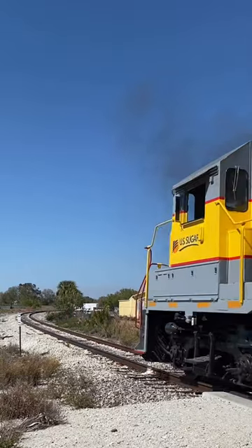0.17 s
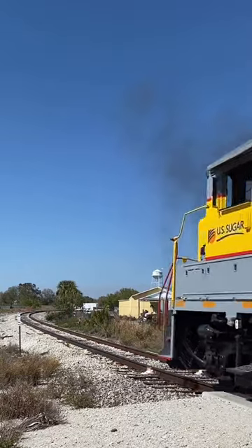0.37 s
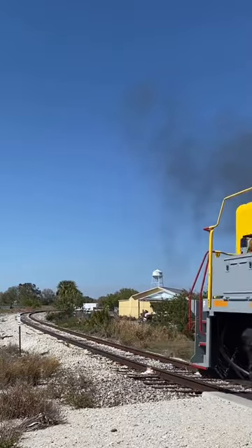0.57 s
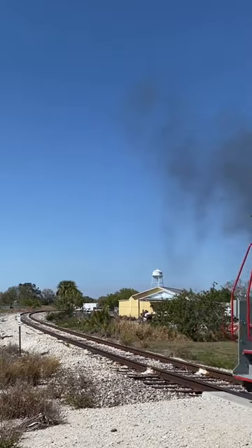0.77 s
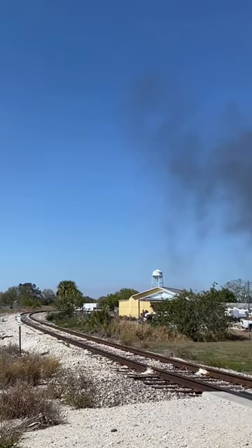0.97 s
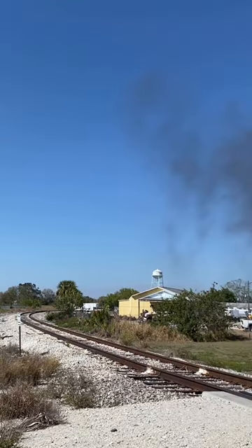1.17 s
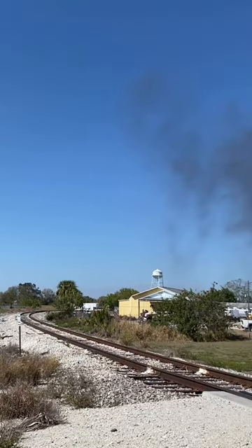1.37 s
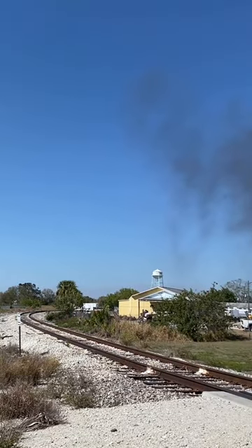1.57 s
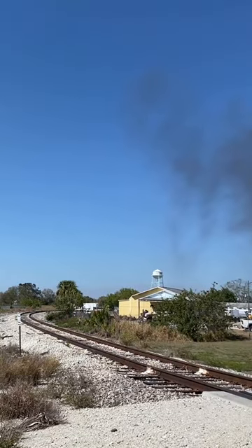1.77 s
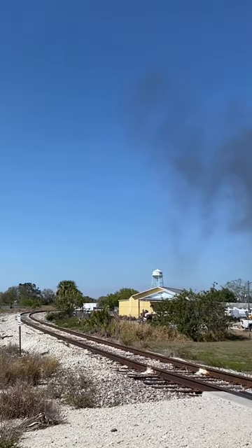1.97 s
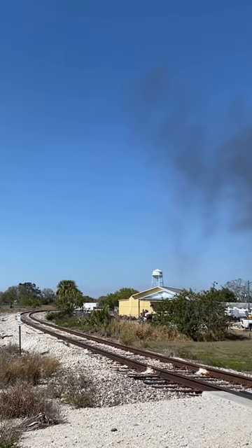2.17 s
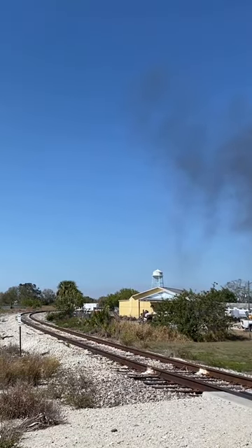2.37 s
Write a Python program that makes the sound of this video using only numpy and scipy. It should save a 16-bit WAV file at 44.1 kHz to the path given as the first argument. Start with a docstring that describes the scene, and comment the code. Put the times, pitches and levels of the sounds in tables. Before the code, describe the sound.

A diesel locomotive is already alongside at 0 s, with deep engine boom, surging wheel roar, crunching grit and short steel scrapes, strongest until about 0.6 s. A tiny falling squeak comes near 0.24 s. From 0.7 s thin, raspy flange squeals and hiss waver over the rumble. After 1.2 s the wheels fade, leaving a slow throb about five times a second, receding until 2.5 s. Open air, close stereo.

```python
"""A diesel locomotive rolls past close by on curved track in open country and draws away.
Its slow engine throbs once per crank turn, from summed crank-order tones; filtered noise gives its surging rumble.
The wheels roar, crunch and scrape as shaped noise, and one falling chirp is a squeak of steel.
Thin flange tones, wavering and raspy, swell and fade in the curve; a microphone pair hears it all."""
import sys
import numpy as np
from scipy import signal
from scipy.fft import rfft, irfft
from scipy.io import wavfile

SR = 44100
rng = np.random.default_rng(int(sys.argv[2]) if len(sys.argv) > 2 else 0)


def dump(signal):
    """Clip the signal to [-1, 1] and save it as 16-bit WAV at the path in sys.argv[1]."""
    limited = np.clip(np.atleast_2d(signal).T, -1, 1)
    pcm = np.round(limited * 32767).astype(np.int16)
    wavfile.write(sys.argv[1], SR, pcm)


N = 111573
T, HZ = np.arange(N) / SR, np.fft.rfftfreq(N, 1 / SR)


def amp(db):
    """Decibels to gain."""
    return 10 ** (np.asarray(db) / 20)


def unit(x):
    """Scales to rms 1."""
    return x / np.sqrt(np.mean(abs(x) ** 2) + 1e-20)


def by_hz(points):
    """Reads a table over log frequency."""
    f, value = np.transpose(points)
    return np.interp(np.log(HZ + 1), np.log(f + 1), value)


def level(rows, order=1):
    """Gain over time from one dB column of a table."""
    rows = np.array(rows)
    return amp(np.interp(T, rows[:, 0], rows[:, order]))


def wander(rate_hz, size=4096):
    """Slow random motion of rms 1."""
    step_s = N / SR / size
    hz = np.fft.rfftfreq(size, step_s)
    slow = irfft(rfft(rng.standard_normal(size)) / (1 + (hz / rate_hz) ** 4), size)
    return np.interp(T, np.arange(size) * step_s, unit(slow))


def swell(middle, half):
    """A bell-shaped rise and fall; half is its standard deviation in seconds."""
    return np.exp(-.5 * ((T - middle) / half) ** 2)


# microphone pair, lead of the left port: (frequency [Hz], phase [rad])
PAIR_PHASE = [(20, 0), (170, 0), (330, -.22), (750, -1.15), (1200, -1.1), (1500, -.4), (2100, 0), (4000, 0),
              (4400, .45), (5100, .15), (5600, .9), (6500, 2.9), (8100, 3.3), (9700, 6.25), (11200, 6.5),
              (12700, 9.2)]
# microphone pair, left-right likeness: (frequency [Hz], likeness [0-1])
PAIR_LIKENESS = [(80, 1), (140, .999), (250, .985), (400, .9), (600, .8), (900, .72), (1400, .45),
                 (2000, .9), (2500, .98), (3700, .98), (4400, .75), (5100, .88), (6000, .55), (7000, .75),
                 (8400, .55), (10000, .7), (12500, .5)]
# microphone pair, left minus right: (frequency [Hz], level [dB])
PAIR_BALANCE = [(60, 0), (110, .1), (200, .4), (360, 2.6), (650, -1), (1170, -3.6), (2130, 1.2),
                (3860, -.6), (6990, .5), (12700, -.4)]


def ports(x, other):
    """Spreads a sound over two microphone ports; other is its diffuse twin."""
    like = np.clip(by_hz(PAIR_LIKENESS), 0, 1)
    phase = by_hz(PAIR_PHASE)
    side = np.array([[1], [-1]])  # left, right
    z = np.sqrt(1 + like) * rfft(x) + side * np.sqrt(1 - like) * rfft(other)
    z = z * np.exp(.5j * side * phase) * amp(side * by_hz(PAIR_BALANCE) / 2)
    return irfft(z / np.sqrt(np.maximum(1 + like * np.cos(phase), .2)), N)


def rush(colour, envelope):
    """Noise of a given spectrum and envelope at both ports."""
    noise = irfft(rfft(rng.standard_normal((2, N))) * colour, N)
    return ports(*(envelope * unit(noise)))


def halves(colour, split_hz):
    """Splits a spectrum into its lower and upper part."""
    low = 1 / (1 + (HZ / split_hz) ** 8)
    return colour * np.sqrt(low), colour * np.sqrt(1 - low)


def peak(hz, width_hz):
    """The spectrum of one resonance."""
    return 1 / (1 + ((HZ - hz) / (.75 * width_hz)) ** 2)


RIPPLE_DB, RIPPLE_HZ = 2.3, 30  # rms depth, spacing of the random gains


def ripple():
    """The many close resonances of wheels and rails, as random gains over frequency."""
    knots = np.arange(0, SR / 2, RIPPLE_HZ)
    return amp(RIPPLE_DB * np.interp(HZ, knots, rng.standard_normal(len(knots))))


# body and track boom under the load:
# (middle time [s], half length [s], pitch [Hz], level [dB])
LOAD_BOOMS = [(.088, .02, 275, -15), (.125, .05, 107, -20), (.505, .02, 264, -20), (.535, .02, 101, -17),
              (1.05, .025, 103, -15.5), (.94, .025, 92, -18), (1.52, .03, 104, -19), (1.37, .03, 378, -30),
              (1.655, .025, 275, -29), (1.78, .018, 218, -24), (1.06, .08, 271, -26), (1.38, .1, 274, -26),
              (.94, .05, 436, -32), (1.315, .04, 746, -35), (1.82, .05, 431, -30), (.18, .018, 410, -28),
              (1.11, .022, 200, -24), (2.2, .035, 365, -33)]


def booms():
    """Low resonances of body and track swell and die under the load."""
    out = np.zeros(N)
    for middle, half, hz, db in LOAD_BOOMS:
        tone = np.sqrt(2) * np.cos(2 * np.pi * (hz * T + rng.random()))
        out += amp(db) * swell(middle, half) * tone
    return ports(out, np.zeros(N))


SQUEAK_S, SQUEAK_HALF_S = .2386, .0019
SQUEAK_HZ, SQUEAK_GLIDE_HZ_PER_S = 5460, -75000  # pitch at the middle, its fall
SQUEAK_RASP_DB, SQUEAK_RASP_HALF_S = -25, .003
# partials of the squeak: (ratio to its pitch, level [dB])
CHIRP_PARTIALS = [(1, -16.5), (1.58, -28), (2, -29)]


def squeak():
    """One very short slip of steel: a falling chirp with a rasp."""
    t = T - SQUEAK_S
    phase = 2 * np.pi * (SQUEAK_HZ * t + SQUEAK_GLIDE_HZ_PER_S * t ** 2 / 2)
    partials = sum(amp(db) * np.exp(1j * ratio * phase) for ratio, db in CHIRP_PARTIALS)
    chirp = swell(SQUEAK_S, SQUEAK_HALF_S) * partials
    rasp_level = amp(SQUEAK_RASP_DB) * swell(SQUEAK_S, SQUEAK_RASP_HALF_S)
    return ports(chirp.real, chirp.imag) + rush(amp(by_hz(SCRAPE_COLOUR)), rasp_level)


SQUEAL_WAVER, SQUEAL_WAVER_HZ = .0007, 18  # rms pitch waver as a fraction, its rate
SQUEAL_UNSTEADY, SQUEAL_WIDTH_HZ = .15, 22  # slower unsteadiness, its rate
SQUEAL_RASP, SQUEAL_RASP_PER_HZ = .27, .02  # fast rasp, its rate per Hz of pitch
# wheel modes set singing by the flange:
# (start time [s], length [s], pitch [Hz], level [dB], fade [s])
FLANGE_TONES = [(0, .6, 938, -43, .05), (.74, .25, 3295, -40, .05), (.825, .07, 3325, -38, .05),
                (.75, .09, 4192, -39, .04), (.78, .22, 2745, -43, .05), (.82, .09, 3510, -40, .05),
                (.73, .22, 5060, -46.5, .04), (.825, .06, 5075, -39.5, .03), (.945, .085, 5048, -36, .05),
                (1.06, .05, 5048, -42, .03), (1.2, .06, 5045, -39, .03), (1.29, .17, 5042, -44, .06),
                (.85, 1.45, 8590, -57, .1), (.9, .22, 5945, -48.5, .08), (1.27, .66, 10223, -53, .15),
                (1.34, .07, 10235, -50, .04), (1.7, .06, 10223, -50, .04), (1.3, .9, 5128, -49.5, .3),
                (1.56, .27, 5036, -45, .1), (1.83, .53, 5035, -42, .14), (1.5, 1.1, 2745, -53, .1),
                (1.56, .08, 5940, -49, .04), (1.69, .21, 5940, -46.5, .06), (1.97, .33, 5940, -47.5, .14),
                (1.78, .75, 4137, -48.5, .15)]


def squeals():
    """Wheel modes swell, waver and fade, with a fast rasp, while the flange rubs the rail."""
    out = np.zeros((2, N))
    for start, length, hz, db, fade in FLANGE_TONES:
        gate = np.clip(np.minimum(T - start, start + length - T) / fade + .5, 0, 1)
        pitch = hz * (1 + SQUEAL_WAVER * wander(SQUEAL_WAVER_HZ))
        carrier = np.exp(2j * np.pi * np.cumsum(pitch) / SR)
        rasp_hz = SQUEAL_RASP_PER_HZ * hz
        for twin in out:
            drive = 1 + SQUEAL_UNSTEADY * (wander(SQUEAL_WIDTH_HZ) + 1j * wander(SQUEAL_WIDTH_HZ))
            drive += SQUEAL_RASP * (wander(rasp_hz) + 1j * wander(rasp_hz))
            tone = unit((drive * carrier * np.exp(2j * np.pi * rng.random())).real)
            twin += amp(db) * gate * tone
    return ports(*out)


CURVE_ENTRY_S, CURVE_RISE_S = 0.644, 0.072
WHEEL_RING_DB, WHEEL_FADE_DB_PER_S = -42.5, 2.4
# wheel modes that ring loosely through the curve: (pitch [Hz], width [Hz], level [dB])
LOOSE_MODES = [(2760, 63, -9), (3275, 89, -1.5), (3470, 39, -7), (4230, 190, 0.5), (5160, 240, 3),
               (5980, 41, 2.5), (6120, 124, -5)]
# rough knocks and rubs of the flange, and the short ringing tail of the squeak at 0.248 s: # (middle time [s],
# half length [s], pitch [Hz], width [Hz], level [dB])
FLANGE_RUBS = [(0.067, .016, 4230, 160, -36), (.12, .04, 5290, 120, -42), (0.248, 0.0035, 5350, 400, -28),
               (0.511, 0.0099, 3305, 260, -28), (0.53, 0.024, 2880, 120, -37),
               (0.675, .025, 2880, 150, -38), (1.989, .012, 2250, 500, -41), (2, .01, 3200, 250, -42),
               (2.22, 0.021, 5470, 420, -43)]


def flanges():
    """Flanges keep the wheels ringing roughly in the curve; separate short rubs are harder, and the squeak
    rings on briefly."""
    since = T - CURVE_ENTRY_S
    ringing = np.clip(since / CURVE_RISE_S, 0, 1) * amp(WHEEL_RING_DB - WHEEL_FADE_DB_PER_S * since)
    modes = sum(amp(db) * peak(hz, width) for hz, width, db in LOOSE_MODES)
    out = rush(modes, ringing)
    for middle, half, hz, width, db in FLANGE_RUBS:
        out += rush(peak(hz, width), amp(db) * swell(middle, half))
    return out


CRUNCH_PER_S, CRUNCH_SPREAD_DB = 180, 4  # mean crack rate, spread of crack sizes
CRUNCH_DB = -7  # relative to the wheel roar
CRUNCH_MIDDLE_S, CRUNCH_HALF_S = 0.18, 0.39  # when the crunch is nearest
# grit crushed under the tread: (frequency [Hz], level per Hz [dB])
GRIT_COLOUR = [(700, -9), (1300, 1), (2800, 1), (4200, -6), (5800, -13), (7000, -21), (10000, -17),
               (13000, -36)]


def crunch():
    """Grit cracks at random under the nearest wheels and rings the steel."""
    sizes = amp(CRUNCH_SPREAD_DB * np.minimum(rng.exponential(1, (2, N)), 3))
    sizes *= rng.choice([-1, 1], (2, N))
    clicks = sizes * (rng.random(N) < CRUNCH_PER_S / SR)
    cracks = unit(irfft(rfft(clicks) * amp(by_hz(GRIT_COLOUR)) * ripple(), N))
    nearness = swell(CRUNCH_MIDDLE_S, CRUNCH_HALF_S)
    return ports(*(cracks * amp(CRUNCH_DB) * level(WHEEL_ROAR_LEVEL, order=2) * nearness))


# flange scrapes: (middle time [s], half length [s], level [dB])
FLANGE_SCRAPES = [(0.076, 0.02, -31), (0.155, 0.027, -34.5), (0.388, 0.024, -43.5), (0.502, 0.017, -34),
                  (0.557, 0.02, -40.5), (0.935, 0.021, -60), (1.99, .018, -45)]
# colour of a scrape, also of the squeak's rasp: (frequency [Hz], level per Hz [dB])
SCRAPE_COLOUR = [(1500, -30), (3000, -14), (5400, 3), (6300, -2.5), (7200, -17), (8600, -1), (11000, -7.5),
                 (13000, -20)]


def scrapes(contact, steel):
    """Short bursts of noise as the flange scrapes the rail."""
    scraping = sum(amp(db) * swell(middle, half) for middle, half, db in FLANGE_SCRAPES)
    return rush(amp(by_hz(SCRAPE_COLOUR)) * steel, scraping * contact)


HISS_SPLIT_HZ, FIZZ_FLUTTER_DB, FIZZ_FLUTTER_HZ = 8000, 1.7, 11
# steel sliding on steel: (frequency [Hz], level per Hz [dB])
HISS_COLOUR = [(3800, 4), (4600, -5), (5200, 5), (5900, 4), (6700, -6), (7800, -9), (8600, -3.5),
               (10500, -6), (12300, -7), (13200, -54)]
# (time [s], hiss level [dB], top fizz level [dB])
SLIDING_LEVEL = [(0, -37, -49), (.19, -32, -49), (.29, -40.5, -57), (.65, -39, -50.5), (.8, -39.5, -42.5),
                 (1.05, -36.5, -44.5), (1.2, -41.5, -48.5), (1.38, -38.5, -45), (1.55, -44, -51.5),
                 (1.78, -42.5, -48), (2.2, -42.5, -51.5), (2.53, -45.5, -52.5)]


def sliding(contact, steel):
    """Steel sliding on steel hisses, with a fluttering fizz on top."""
    hiss, fizz = halves(amp(by_hz(HISS_COLOUR)) * steel, HISS_SPLIT_HZ)
    flutter = amp(FIZZ_FLUTTER_DB * wander(FIZZ_FLUTTER_HZ))
    out = rush(hiss, level(SLIDING_LEVEL) * contact)
    return out + rush(fizz * ripple(), level(SLIDING_LEVEL, order=2) * contact * flutter)


ROAR_SPLIT_HZ = 2000
# wheels on rail: (frequency [Hz], level per Hz [dB])
ROAR_COLOUR = [(410, 5), (700, -1.5), (943, 4.5), (1320, -3), (1480, -2), (1800, -9), (2710, -9.5),
               (3110, -13.5), (3370, -13.5), (3800, -18), (4800, -17.5), (6240, -51), (10600, -120)]
# (time [s], rail roar level [dB], wheel roar level [dB]); the crunch follows the wheel roar
WHEEL_ROAR_LEVEL = [(0.0, -22.5, -33.5), (0.03, -30.5, -37.5), (0.08, -25.5, -28.5), (0.34, -31, -36.5),
                    (0.39, -25, -29.5), (0.46, -33.5, -38), (0.5, -23.5, -27.5), (0.62, -31.5, -35),
                    (0.84, -32, -33.5), (0.96, -26.5, -32.5), (0.99, -32.5, -34.5), (1.75, -38, -41),
                    (2.48, -55.5, -46), (2.53, -54, -41.5)]


def roar(contact, steel):
    """Rolling contact shakes the rail below the split and the wheel above it."""
    rail, wheel = halves(amp(by_hz(ROAR_COLOUR)) * steel, ROAR_SPLIT_HZ)
    out = rush(rail, level(WHEEL_ROAR_LEVEL) * contact)
    return out + rush(wheel, level(WHEEL_ROAR_LEVEL, order=2) * contact)


FLICKER_DB, FLICKER_HZ, GRIT_DB, GRIT_HZ = 1, 22.3, 0.5, 300  # rms depth and rate of each


def wheels():
    """Rolling roar, sliding hiss and scrapes, all roughened by the same uneven contact."""
    contact = unit(amp(FLICKER_DB * wander(FLICKER_HZ) + GRIT_DB * wander(GRIT_HZ)))
    steel = ripple()
    return roar(contact, steel) + sliding(contact, steel) + scrapes(contact, steel)


CRANK_HZ, THROB_AT_S = 5.13, 1.83  # crank turns per second, time of one throb peak
THROB_NEAR, THROB_DEPTH = .05, .6  # throb depth while alongside, and once behind
THROB_SHARP, BOOM_THROB = 1.1, .26  # sharpness of the throb, its share in the boom
ENGINE_ROUGH, ENGINE_WAVER_HZ = .22, 4.3  # unevenness of the tones, its rate
CYLINDERS, FIRING_DEPTH = 16, .28  # each fires once per crank turn
RUMBLE_SPLIT_HZ = 338
# times between which the throb deepens: (start [s], end [s])
THROB_EMERGES = [.5, 1.2]
# engine tones: (multiple of the crank rate, level beside the engine [dB], level far behind it [dB])
CRANK_ORDERS = [(8, -28, -35), (13, -32.5, -35.5), (15, -29, -20), (17, -32.5, -32.5), (19, -33.5, -31),
                (21, -26.5, -37), (23, -38, -36), (28, -35.5, -40), (40, -33.5, -38.5), (53, -36, -51)]
# exhaust boom: (frequency [Hz], level per Hz [dB])
EXHAUST_COLOUR = [(20, -48), (34, -46), (40, -27), (50, -0.5), (68, 2.5), (105, 2), (140, -1), (180, -5.5),
                  (300, -49.5)]
# exhaust boom: (time [s], level [dB])
EXHAUST_LEVEL = [(0, -20.5), (.55, -23), (1.1, -18.5), (1.6, -24.5), (2.53, -26)]
# body resonances: (frequency [Hz], level per Hz [dB])
BODY_COLOUR = [(100, -35), (165, -11.5), (200, 1.5), (240, 0), (275, 1.5), (315, -7.5), (365, -3.5),
               (400, -9), (436, -5.5), (490, -12), (700, -16), (1000, -31), (2000, -63)]
# (time [s], low rumble level [dB], upper rumble level [dB])
BODY_LEVEL = [(0, -34.5, -34.5), (.09, -24, -21.5), (.14, -22, -31), (.3, -30, -32), (.5, -21.5, -24),
              (.76, -27.5, -28), (.94, -20, -25), (1.0, -24.5, -27.5), (1.2, -26.5, -32),
              (1.36, -21.5, -32), (1.5, -24.5, -29), (1.61, -32.5, -41), (1.78, -25.5, -28.5),
              (1.87, -29, -36.5), (2.02, -31.5, -42), (2.17, -26, -31), (2.27, -32, -40.5),
              (2.53, -38, -50.5)]


def engine():
    """Crank orders throb once a turn; the firings chop the body rumble over the exhaust boom."""
    turns = CRANK_HZ * (T - THROB_AT_S)
    depth = np.interp(T, THROB_EMERGES, [THROB_NEAR, THROB_DEPTH])
    pulse = unit(abs(np.cos(np.pi * turns)) ** (2 * THROB_SHARP))
    throb = unit(1 - depth + depth * pulse)
    tones = np.zeros(N)
    for order, near_db, far_db in CRANK_ORDERS:
        uneven = unit(1 + ENGINE_ROUGH * (wander(ENGINE_WAVER_HZ) + 1j * wander(ENGINE_WAVER_HZ)))
        tone = unit((uneven * np.exp(2j * np.pi * (order * turns + rng.random()))).real)
        tones += tone * throb * amp(np.interp(T, [.5, 1.6], [near_db, far_db]))  # near to far, s
    firing = unit(1 + FIRING_DEPTH * np.cos(2 * np.pi * CYLINDERS * turns))
    low, upper = halves(amp(by_hz(BODY_COLOUR)), RUMBLE_SPLIT_HZ)
    rumble = rush(low, level(BODY_LEVEL) * firing) + rush(upper, level(BODY_LEVEL, order=2) * firing)
    boom_throb = 1 - BOOM_THROB + BOOM_THROB * throb
    boom = rush(amp(by_hz(EXHAUST_COLOUR)), level(EXHAUST_LEVEL) * boom_throb)
    return tones + rumble + boom


def scene():
    """Running gear and engine together, passing close to the microphones."""
    return booms() + squeak() + squeals() + flanges() + crunch() + wheels() + engine()


def record(dry):
    """The recorder's band limit: a low-pass at 13150 Hz."""
    lowpass = signal.firwin(511, 13150, window=("kaiser", 9), fs=SR)
    return signal.oaconvolve(dry, lowpass[None], "same")


dry = scene()
out = record(dry)
dump(out)
```